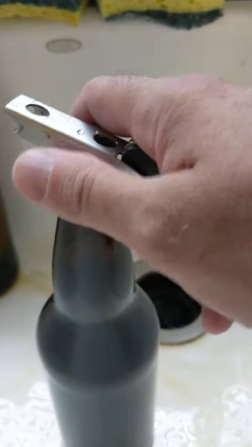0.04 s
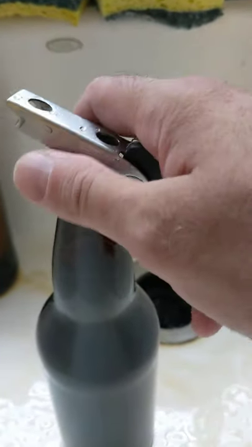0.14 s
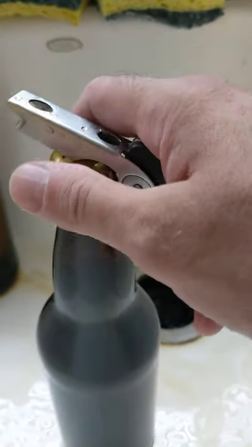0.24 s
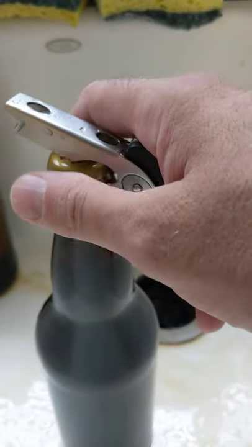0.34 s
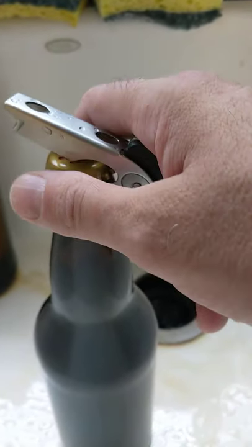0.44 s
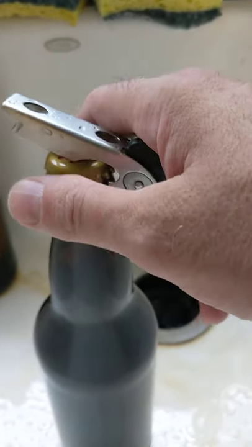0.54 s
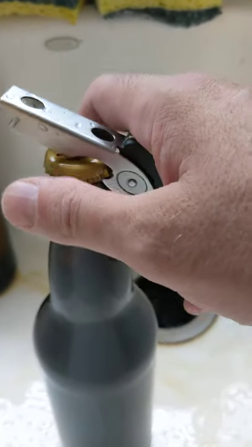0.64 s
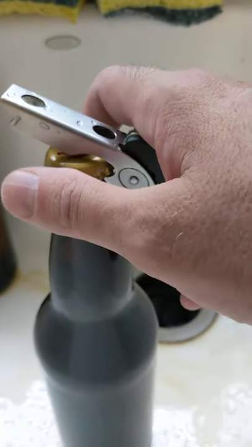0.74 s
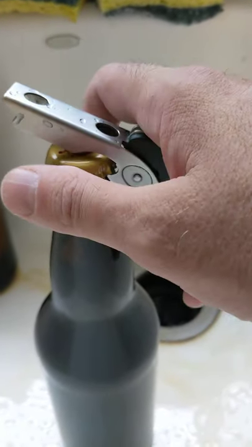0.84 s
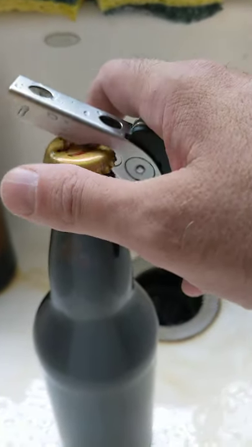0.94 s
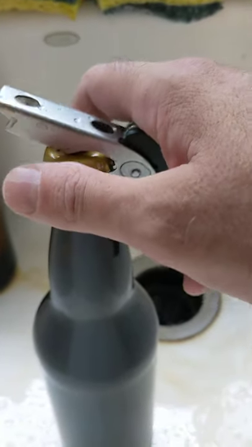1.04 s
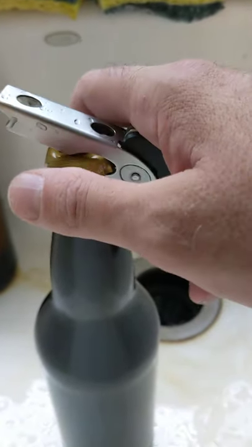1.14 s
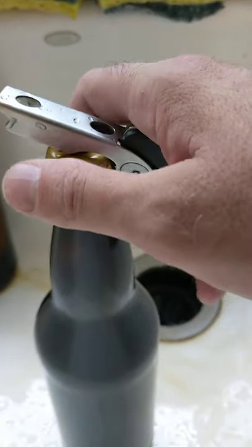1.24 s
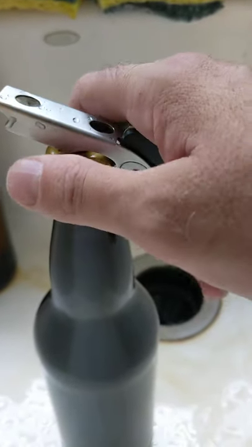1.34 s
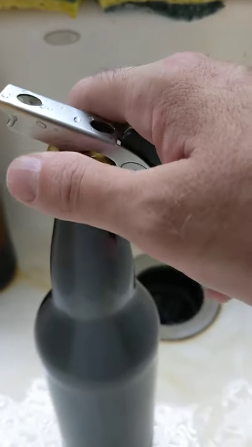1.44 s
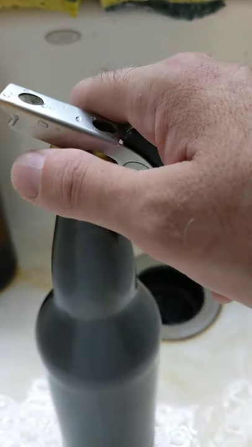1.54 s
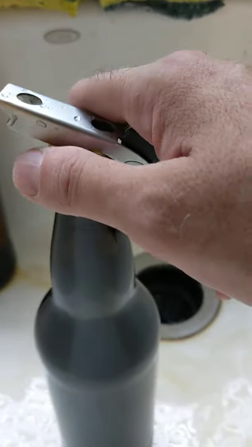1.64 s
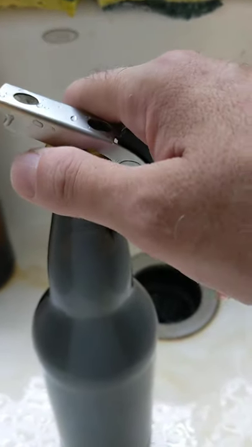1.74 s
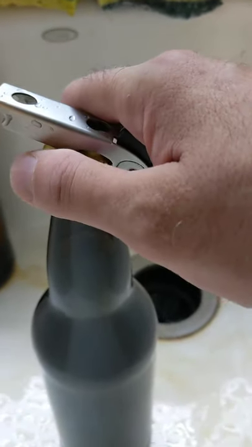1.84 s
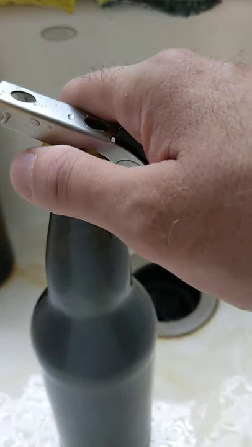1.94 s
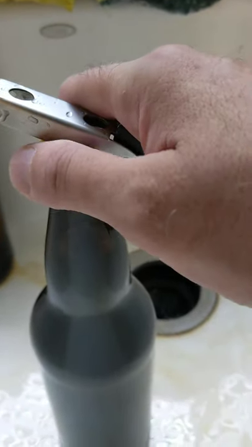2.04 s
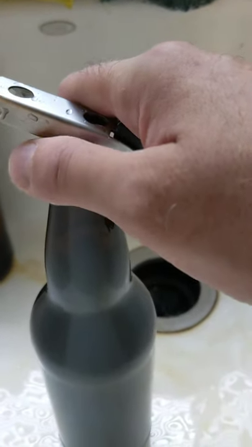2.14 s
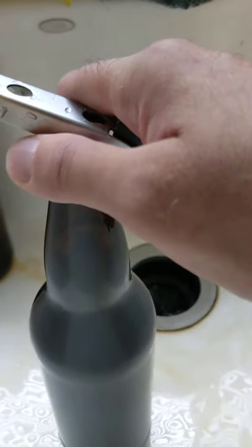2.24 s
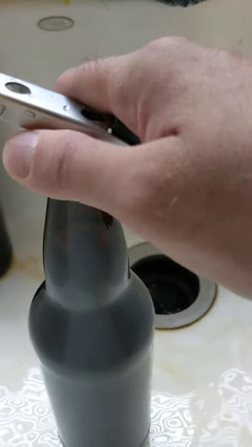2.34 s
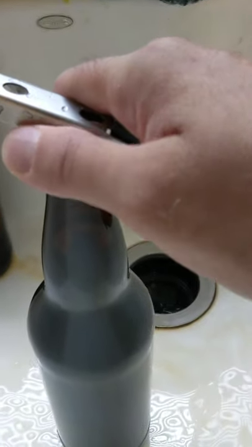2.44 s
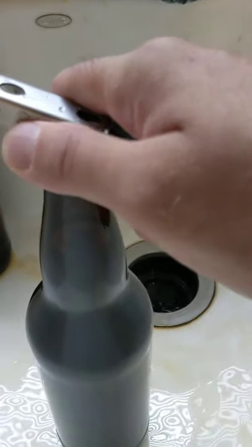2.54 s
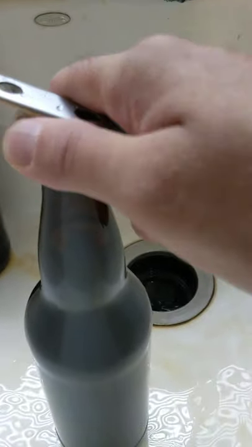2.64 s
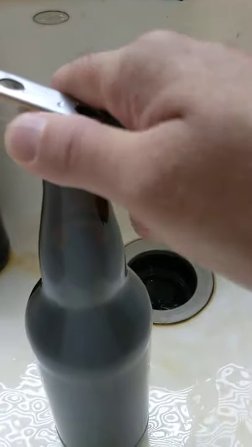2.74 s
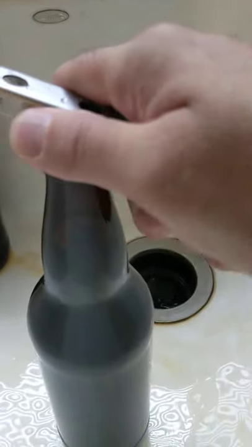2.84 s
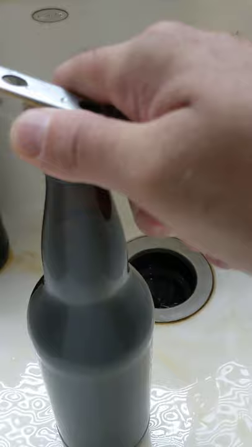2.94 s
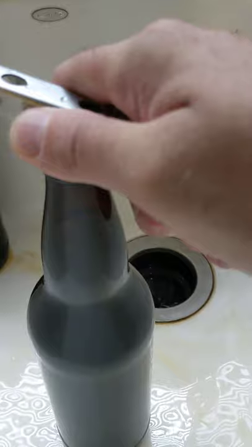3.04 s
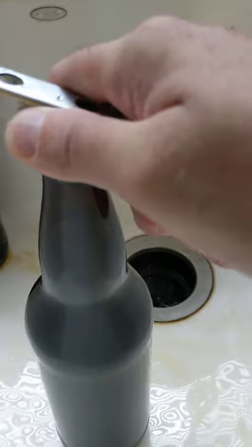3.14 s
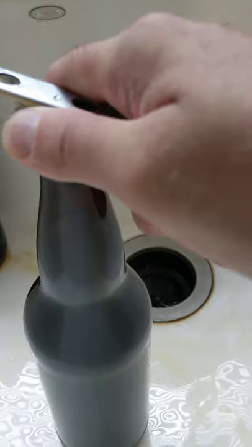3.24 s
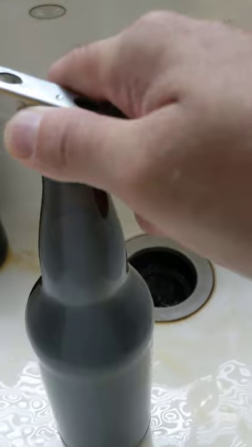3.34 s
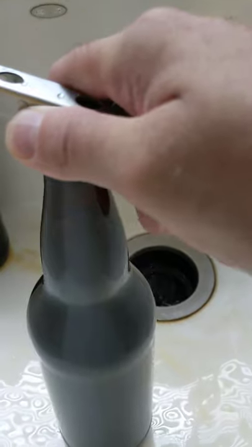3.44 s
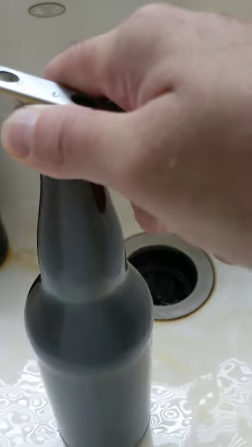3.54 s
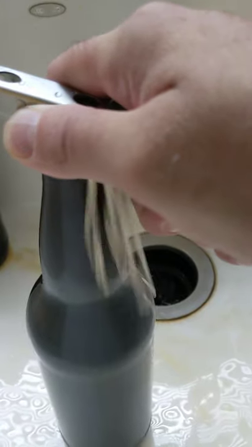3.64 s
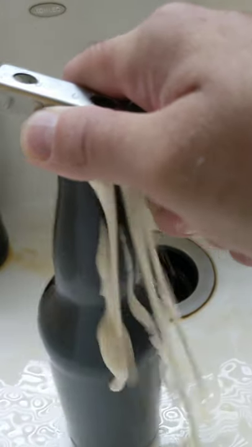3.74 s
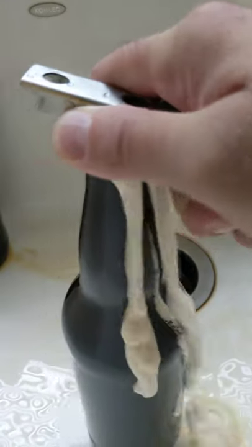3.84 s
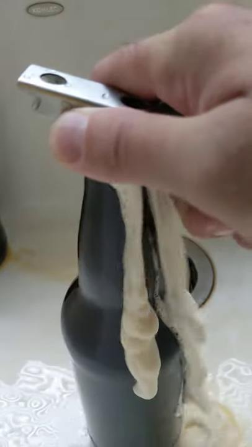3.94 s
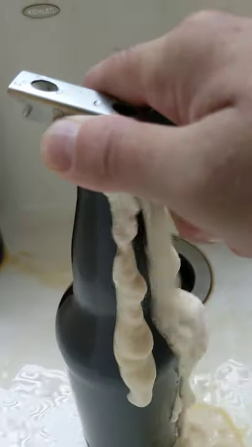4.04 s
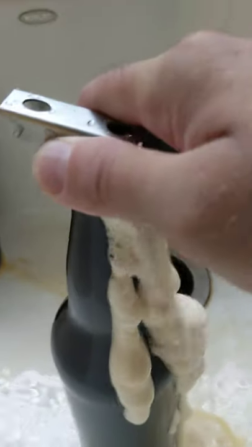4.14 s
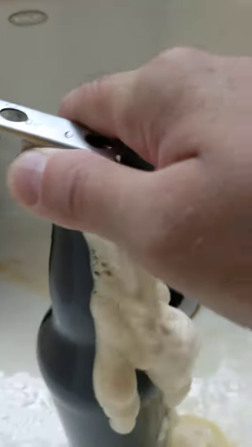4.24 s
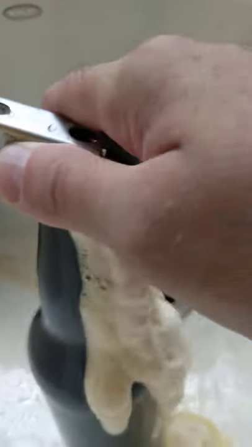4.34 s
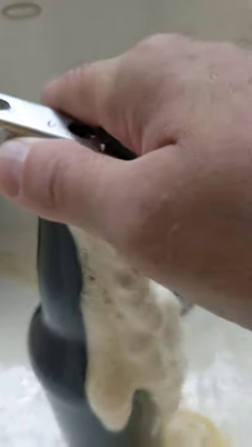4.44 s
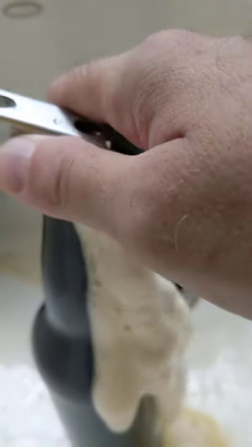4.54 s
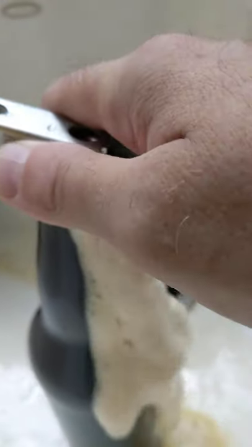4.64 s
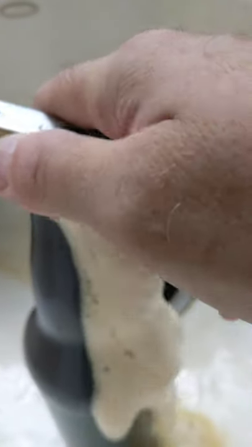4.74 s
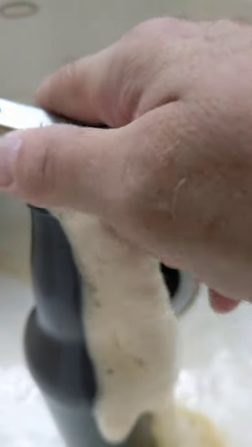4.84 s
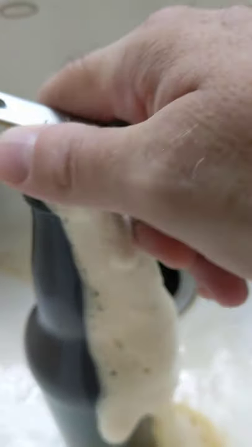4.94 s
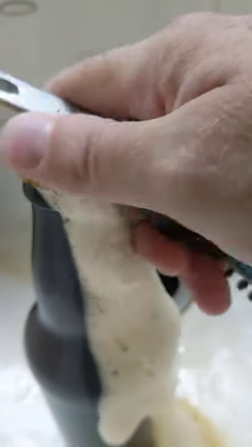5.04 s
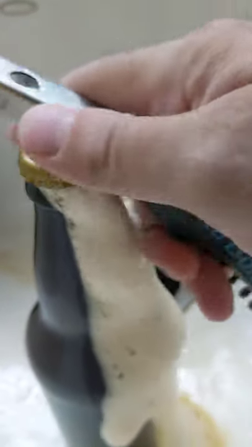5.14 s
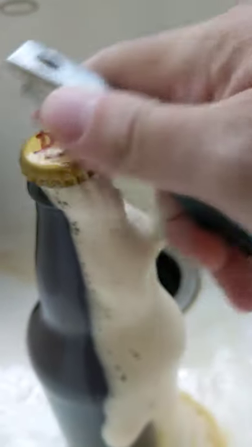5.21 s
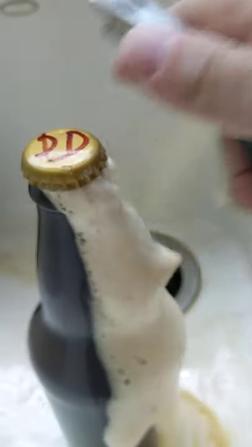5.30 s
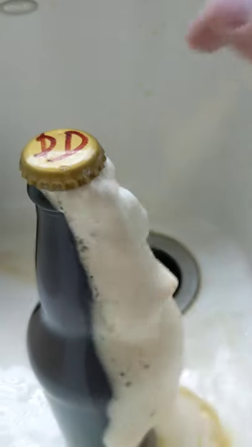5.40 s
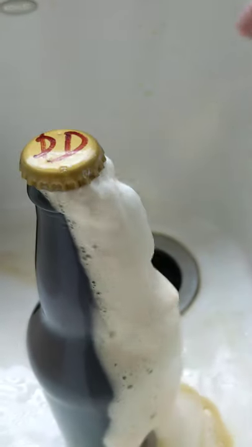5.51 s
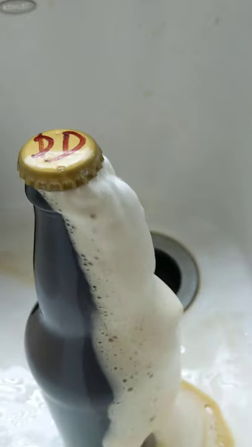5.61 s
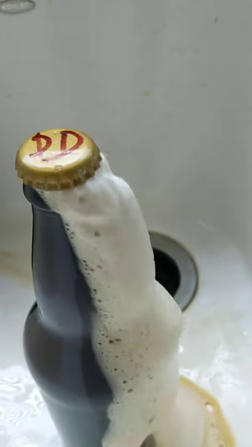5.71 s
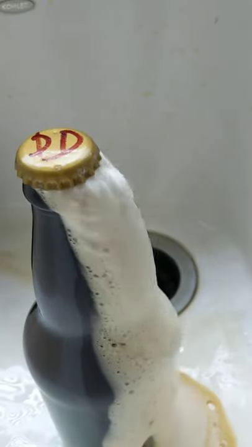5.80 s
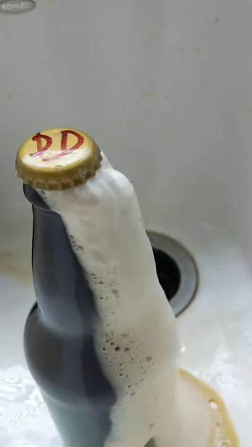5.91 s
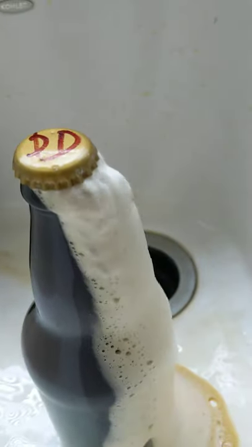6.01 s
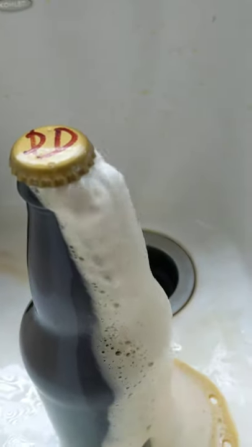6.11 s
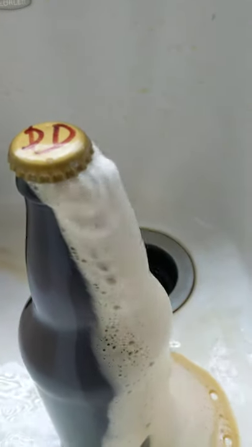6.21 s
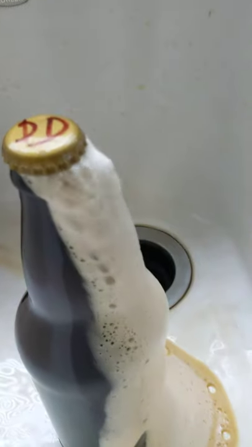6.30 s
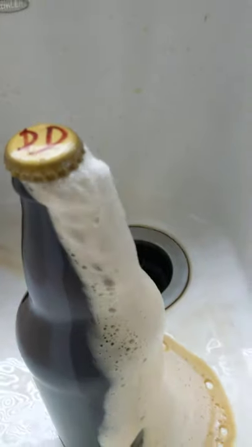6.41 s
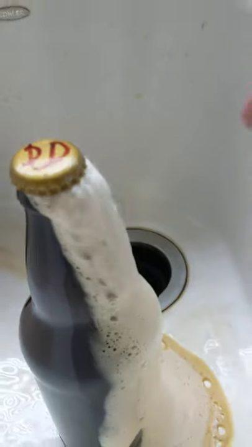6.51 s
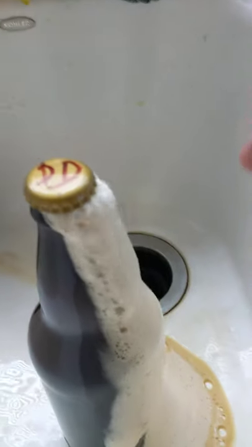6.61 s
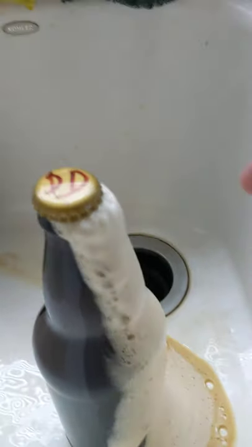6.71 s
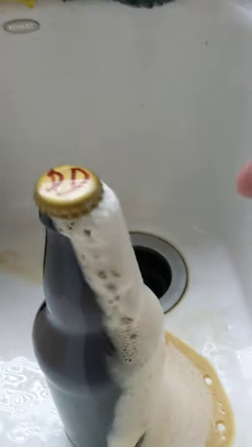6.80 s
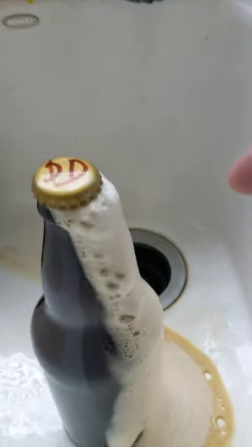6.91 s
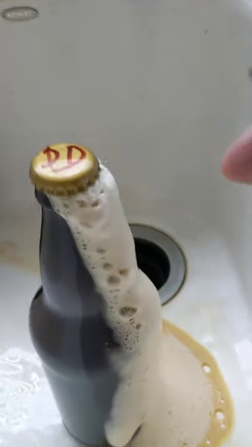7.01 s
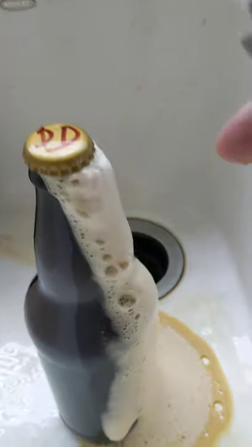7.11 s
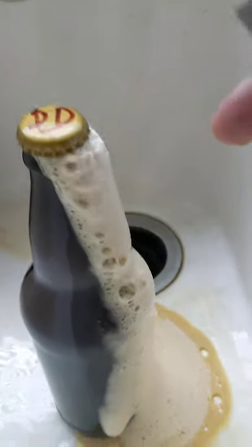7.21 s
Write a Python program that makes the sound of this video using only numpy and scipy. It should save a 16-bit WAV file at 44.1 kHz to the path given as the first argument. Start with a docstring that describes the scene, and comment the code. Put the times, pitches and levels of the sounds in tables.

```python
"""An over-carbonated bottle of beer is opened in a kitchen sink: gas and foam burst from under its cap.
The opener's contacts excite damped modes of bottle and handle; crimps snap as filtered impulses.
Escaping gas is a rush of random bubble pops, coloured and panned; the leak chokes, then a puff drives beer out.
Foam sums four bubble sizes and grows coarser as the pressure falls; falling beer thuds on the basin's modes
and splashes as short noise bands. Appliance motors hum as wavering sines over the noise of room air."""
import sys
import numpy as np
from scipy import signal
from scipy.fft import rfft, irfft, next_fast_len
from scipy.io import wavfile

SR = 44100
rng = np.random.default_rng(int(sys.argv[2]) if len(sys.argv) > 2 else 0)


def log_audio(samples):
    """Write samples as a 16-bit WAV file to the path given in sys.argv[1]."""
    # one column per channel
    frames = np.atleast_2d(samples).T
    # limit to full scale, then quantise
    limited = np.clip(frames, -1, 1)
    pcm = np.round(limited * 32767).astype(np.int16)
    wavfile.write(sys.argv[1], SR, pcm)


N = 320166


def from_db(db):
    """Logarithmic level: decibels become an amplitude gain."""
    return np.exp(np.log(10) / 20 * np.asarray(db))


def rms_one(x):
    """Power normalisation: scale to unit rms."""
    return x / np.sqrt(np.mean(x ** 2) + 1e-20)


def in_time(rows):
    """Linear interpolation: each column of a curve table, one value per sample."""
    s, *columns = np.transpose(rows)
    return [np.interp(np.arange(N) / SR, s, column) for column in columns]


def at_hz(points, hz):
    """Logarithmic pitch: interpolate a table on a log-frequency axis."""
    table_hz, values = np.transpose(points)
    return np.interp(np.log(hz + 1e-3), np.log(table_hz), values)


def since(start_s):
    """Elapsed time: seconds gone by after start_s, 0 before."""
    return np.maximum(np.arange(N) / SR - start_s, 0)


def fade(start_s, end_s):
    """Linear onset: a ramp that is 0 at start_s and 1 at end_s."""
    return np.clip((np.arange(N) / SR - start_s) / (end_s - start_s), 0, 1)


def bump(centre_s, width_s):
    """Gaussian envelope: a smooth swell of height 1."""
    return np.exp(-((np.arange(N) / SR - centre_s) / width_s) ** 2)


def drift(rate):
    """Slow random modulation: normal knots of spread 1, rate per second, joined by lines."""
    knots = rng.standard_normal(4000)
    return np.interp(np.arange(N) / SR * rate, np.arange(len(knots)), knots)


def band(x, low_hz, high_hz):
    """Band limitation: a causal Butterworth band-pass."""
    edges_hz = [low_hz, min(high_hz, .45 * SR)]
    return signal.sosfilt(signal.butter(2, edges_hz, "band", fs=SR, output="sos"), x + 1e-18)


def ring(clicks, hz, t60):
    """Damped resonance: a unit click sets a decaying sine of initial height 1 ringing."""
    decay = from_db(-60 / (t60 * SR))
    angle = 2 * np.pi * hz / SR
    return signal.lfilter([0, np.sin(angle)], [1, -2 * decay * np.cos(angle), decay ** 2], clicks + 1e-18)


def colour(pair, spectrum, likeness, pan, resonances=()):
    """Interaural coherence: two unrelated signals get a spectrum and a stereo place; their mid has rms 1."""
    size = next_fast_len(N)
    hz = np.arange(size // 2 + 1) * SR / size
    a, b = rfft(pair, size)
    level_db = at_hz(spectrum, hz)
    for centre_hz, width_hz, db in resonances:
        level_db = level_db + db / (1 + (2 * (hz - centre_hz) / width_hz) ** 2)
    # roll off beyond both ends of the spectrum table
    top_edge = 1 / (1 + (hz / spectrum[-1][0] / 1.2) ** 8)
    low_edge = 1 / (1 + (.7 * spectrum[0][0] / (hz + 1)) ** 4)
    sides = np.array([[1], [-1]])
    alike = np.clip(at_hz(likeness, hz), -1, 1)
    both = np.sqrt(1 + alike) * a + np.sqrt(1 - alike) * b * sides
    gain = top_edge * low_edge * from_db(level_db + sides * at_hz(pan, hz) / 2)
    out = irfft(both * gain, size)[:, :N]
    return out / np.std(out.mean(axis=0))


def reflect(x, t60):
    """Diffuse reverberation: dense decaying reflections, different at each ear, from a unit-energy response."""
    t = np.arange(SR // 2) / SR
    echoes = rng.standard_normal((2, len(t))) * from_db(-60 * t / t60) * (1 - np.exp(-t / .002))
    echoes /= np.sqrt(np.sum(echoes ** 2, axis=1, keepdims=True))
    return signal.oaconvolve(np.atleast_2d(x), echoes[:, t < t60], axes=1)[:, :N]


SINK_T60_S = 0.083


def bursts(per_s, spread_db):
    """Shot noise: random pops of uneven size on two sides of the cap, heard directly and off the sink walls."""
    chance = rng.laplace(0, 1, (2, N))
    sizes = np.sign(chance) * from_db(spread_db * np.minimum(np.abs(chance), 6))
    pops = sizes * (rng.random((2, N)) < per_s / SR)
    # the outflow wanders round the rim, so the echoes shift in colour
    turn = np.pi / 4 + .5 * drift(2.093)
    echo_a = np.cos(turn) * reflect(pops[0], SINK_T60_S)
    echo_b = np.sin(turn) * reflect(pops[1], SINK_T60_S)
    return pops + echo_a + echo_b


def swishes(rows, pan_db, grain_db):
    """Band noise: short, uneven swells, partly alike at both ears."""
    out = np.zeros((2, N))
    for s, length, db, hz, octaves in rows:
        progress = fade(s, s + length)
        during = (progress % 1) > 0
        swell = np.sqrt(np.sin(np.pi * progress[during])) * from_db(grain_db * drift(250)[during])
        noise = rng.standard_normal((3, SR))
        half_width = 2 ** (octaves / 2)
        noise = rms_one(band(noise[2] + 0.61 * noise[:2], hz / half_width, hz * half_width))
        out[:, during] += from_db(db) * swell * noise[:, -len(swell):]
    return out * from_db([[pan_db / 2], [-pan_db / 2]])


# appliance motors and mains: (frequency [Hz], rms level [dB])
HUM = [(18.4, -47), (39.0, -51), (58.1, -37.5), (61.6, -60), (120, -57), (238, -91), (301, -61.5)]
# spectrum of room air: (frequency [Hz], relative density [dB per Hz])
AIR = [(25, 12.5), (100, -3.5), (165, 4), (195, -10.5), (310, -0.5), (450, -8.5), (800, -16.5),
       (1300, -25.5), (2000, -30.5), (3200, -27), (6000, -31.5), (9500, -36.5), (12700, -41.5),
       (15800, -43)]
# stereo balance of room air: (frequency [Hz], left minus right [dB])
AIR_PAN = [(60, 2.8), (500, 3.7), (3000, 4.3), (12000, 3.9)]
# coherence of room air between the ears: (frequency [Hz], left-right likeness [-1 to 1])
AIR_LIKENESS = [(100, 0.94), (300, 0.59), (800, 0.3), (2500, 0.046)]
AIR_DB = -49.5


def kitchen():
    """Periodic machine tones: motors hum with a slight waver over the soft rush of room air."""
    t = np.arange(N) / SR - np.array([[0], [.0007]])   # the hum reaches the right ear a little later
    hum = np.zeros((2, N))
    for hz, db in HUM:
        height = np.sqrt(2) * from_db(db + 0.8 * drift(3.12))
        hum += height * np.sin(2 * np.pi * (hz * t + rng.random()) + 0.04 * drift(1.9))
    air = colour(rng.standard_normal((2, N)), AIR, AIR_LIKENESS, AIR_PAN)
    return hum * from_db([[.8], [-.8]]) + from_db(AIR_DB) * air


def crunch(at, level_db, low_hz, high_hz, t60):
    """Stick-slip friction: band noise of tiny slips builds up and dies away as the crimped metal gives."""
    clicks = np.zeros(N)
    clicks[at] = from_db(level_db)
    t = np.arange(SR // 4) / SR
    envelope = from_db(-60 * t / t60) * (1 - np.exp(-t / 0.0015))
    force = signal.oaconvolve(clicks, envelope)[:N]
    return force * from_db(4.3 * drift(400)) * rms_one(band(rng.standard_normal((2, N)), low_hz, high_hz))


# opener on cap: (time [s], knock level [dB], bright bottle ring re knock [dB], steel handle re knock [dB])
CONTACTS = [(0.025, -45, -8.5, -17), (0.168, -43.5, -31, -19), (0.312, -51, -25, -26), (0.666, -32, 2, -26),
            (1.060, -38.5, 1, -3.5), (1.075, -40, -9, -9), (1.092, -37, 6, -19), (1.1, -48, 10, -12),
            (1.18, -43.5, -31, -31), (1.193, -45.5, -21, -26), (1.24, -49, -6, -11), (1.484, -46, -20, -28)]
# modes of the capped bottle: (frequency [Hz], relative level [dB], decay t60 [s])
BOTTLE = [(236, -7, 0.36), (451, -6.5, 0.062), (533, 7, 0.05), (641, -8, 0.11), (1146, -3.5, 0.075),
          (2610, -11, 0.098), (2630, -27, 0.5), (2880, -15, 0.13), (3280, -8.5, 0.068), (5140, -10, 0.085),
          (5300, -16, 0.11), (5800, -18, 0.083), (5780, -24, 0.2), (6340, -20, 0.12), (7170, -11, 0.14),
          (7350, -14, 0.11), (7530, -14, 0.18), (9640, -1, 0.19), (11100, -11, 0.14)]
# modes of the steel handle, in close pairs that beat: (frequency [Hz], relative level [dB], decay t60 [s])
HANDLE = [(1448, -14, 0.84), (1502, -9, 0.85), (2584, 1, 0.19), (2720, -13, 0.28), (3994, -9, 0.4),
          (4120, -8, 0.27), (4180, 0.5, 0.22), (4300, -9, .26), (4689, -15, 0.2)]
# steel sliding on the cap: (time [s], length [s], level [dB], centre [Hz], width [octaves])
RUBS = [(0.0, 0.25, -70.5, 10500, .5), (0.0, 0.34, -70, 4200, 1.1), (.93, .08, -66, 5200, 0.13),
        (.95, 0.24, -62, 3270, .6), (.94, 0.071, -63, 750, 1.1), (1.2, .34, -73, 9800, 0.27),
        (2.02, 0.092, -70, 3130, 1.1)]
TICK_DB = -13.5   # the highest modes, relative to the bright ring
THUMP_DB, THUMP_SOFTNESS = -11.5, 0.61   # dB re knock; the duller a touch, the more it thumps, dB per dB
KITCHEN_T60_S = 0.38


def opener():
    """Modal excitation: each bite crunches the cap and rings bottle and handle; the kitchen answers."""
    s, knock_db, bright_db, steel_db = np.transpose(CONTACTS)
    at = np.round(s * SR).astype(int)
    ring_db, handle_db = knock_db + bright_db, knock_db + steel_db
    tick_db = ring_db + TICK_DB
    thump_db = knock_db + THUMP_DB - THUMP_SOFTNESS * bright_db
    out = crunch(at, knock_db - 7.0, low_hz=320, high_hz=750, t60=0.075)
    out += crunch(at, thump_db, low_hz=222, high_hz=282, t60=0.11)
    out += crunch(at, ring_db - 6, low_hz=2500, high_hz=3500, t60=.035)
    out += crunch(at, ring_db - 1, low_hz=4800, high_hz=8000, t60=.048)
    out += crunch(at, tick_db + 0.5, low_hz=8900, high_hz=12500, t60=0.065)
    # low modes follow the knock, middle ones the bright ring, the highest the tick
    drive_db = [knock_db if hz < 2000 else ring_db if hz < 9000 else tick_db for hz, db, t60 in BOTTLE]
    drive_db += [handle_db] * len(HANDLE)
    for (hz, db, t60), mode_drive_db in zip(BOTTLE + HANDLE, drive_db):
        clicks = np.zeros(N)
        clicks[at] = from_db(mode_drive_db + db - 4 + rng.normal(0, 1, len(at)))
        out += ring(clicks, hz, t60)
    out = out + from_db(-4.5) * reflect(out, KITCHEN_T60_S)
    return out * from_db([[1.5], [-3]]) + swishes(RUBS, pan_db=9, grain_db=2.5)


# crimps of the cap snapping as they bend: (time [s], level before a 6 dB lift [dB], low [Hz], high [Hz])
SNAPS = [(0.4037, -27, 9200, 15500), (0.407, -24.5, 10400, 15900), (0.54, -37, 8000, 12000),
         (0.547, -29, 4500, 10500), (0.5478, -29, 3500, 10900)]


def crimps():
    """Impulse response: each tiny dry snap is a band-passed impulse, echoed by the sink."""
    out = np.zeros(N)
    for s, db, low_hz, high_hz in SNAPS:
        at = round(s * SR)
        out[at:at + 256] += from_db(db + 6) * band(signal.unit_impulse(256), low_hz, high_hz)
    return (out + from_db(-3.5) * reflect(out, SINK_T60_S)) * from_db([[2], [-2]])


# spectra of the gas hiss, its finest part and wet spitting: (frequency [Hz], relative density [dB per Hz])
GAS = [(4000, -29), (6000, -15), (6800, -14), (7600, -5.5), (8400, -4.5), (9400, 0.5), (9900, 1.5),
       (10700, -6), (11500, 0), (12700, -17), (14000, -7.5), (15800, -8.5)]
MIST = [(10500, -7.5), (12400, -5.5), (13800, -7), (14700, -7.5), (16000, -11)]
SPIT = [(300, -7), (900, -14.5), (1250, -12.5), (1700, -11.5), (2200, -9.5), (2700, -3.5), (3300, -3.5),
        (4400, 1), (5600, 5.5), (6500, -3.5), (8000, 0)]
# resonances of the hollow between cap, hand and sink: (frequency [Hz], width [Hz], boost [dB])
HOLLOW = [(695, 110, 11.5), (1362, 150, 4), (2940, 200, 4), (3208, 18, 5.5), (3783, 110, 5.5),
          (4180, 490, 6.5), (5060, 37, 7.5), (5600, 190, 6), (7190, 130, 5), (7570, 100, 5), (9300, 120, 3),
          (9900, 170, 3)]
# stereo balance of gas and foam: (frequency [Hz], left minus right [dB])
FIZZ_PAN = [(60, 0), (99, 4), (160, 24), (270, 3), (450, 8), (740, 13), (1220, 11.5), (2010, 3),
            (3330, 8.5), (5500, 5), (9080, 7.5), (15000, -0.5)]
# coherence of gas and foam between the ears: (frequency [Hz], left-right likeness [-1 to 1])
FIZZ_LIKENESS = [(150, 1), (300, 0.34), (500, 0.41), (620, -.1), (800, 0.33), (1050, -0.16), (1300, 0.64),
                 (1550, 0.27), (2100, -0.37), (3000, -0.0084)]
# the seal gives: the hiss swells, overshoots, holds, then dies as liquid chokes the gap
LEAK_S, LEAK_ATTACK_S, LEAK_DB = 2.6764, 0.095, -27
OVERSHOOT_DB, OVERSHOOT_S = 2.5, 0.15
CHOKE_S, CHOKE_DB_PER_S = 3.303, 39.5
SPIT_DB, SPIT_FOLLOWS = -40, 0.86   # wet spitting, and its share of the hiss's swing
TOP_DB, TOP_FOLLOWS = -35, 2.1   # the finest hiss needs the most pressure and dies first
# a puff of gas drives out the first slug of beer
PUFF_S, PUFF_DB, PUFF_T60_S = 3.651, -34, 0.086
# beer wells up in the gap and spits ahead of the foam
WELL_S, WELL_WIDTH_S, WELL_DB = 3.74, 0.084, -38.5


def gas():
    """Turbulent jet noise: gas hisses and spits through the wet seal until liquid chokes it; a puff follows."""
    overshoot_db = OVERSHOOT_DB * np.exp(-(since(LEAK_S + LEAK_ATTACK_S) / OVERSHOOT_S) ** 2)
    flow_db = overshoot_db - CHOKE_DB_PER_S * since(CHOKE_S)
    puff = from_db(PUFF_DB - 60 * since(PUFF_S) / PUFF_T60_S) * (since(PUFF_S) > 0)
    well = from_db(WELL_DB) * bump(WELL_S, WELL_WIDTH_S)
    hiss = colour(bursts(per_s=30000, spread_db=2.5), GAS, FIZZ_LIKENESS, FIZZ_PAN, HOLLOW)
    top = colour(bursts(per_s=30000, spread_db=0.0), MIST, FIZZ_LIKENESS, FIZZ_PAN)
    spit = colour(bursts(per_s=12000, spread_db=3.0), SPIT, FIZZ_LIKENESS, FIZZ_PAN)
    leak = hiss * (from_db(LEAK_DB + flow_db) + puff)
    leak += top * from_db(TOP_DB + TOP_FOLLOWS * flow_db)
    leak += spit * (from_db(SPIT_DB + SPIT_FOLLOWS * flow_db) + well)
    return leak * from_db(.5 * drift(60)) * fade(LEAK_S, LEAK_S + LEAK_ATTACK_S) ** 2


# foam jet at the cap: (time [s], spray level before the gush [dB], coarseness: big bubbles over spray [dB])
FOAM = [(4.0, -27.5, -3.5), (4.04, -27, -4), (4.65, -29, -3), (5.42, -25.5, -8), (5.76, -23.5, -7.5),
        (6.22, -28, -0.5), (6.4, -27, -0.5), (6.59, -34.5, 4.5), (7.26, -32.5, 5)]
# spectra of three larger bubble sizes, small to large: (frequency [Hz], relative density [dB per Hz])
SPRAY = [(3500, -23.5), (6000, -2), (6600, -4), (7400, -1.5), (8300, -3), (9600, 1.5), (10600, -6),
         (11500, -0.5), (12400, -19), (14000, -34)]
COARSE = [(1500, -22.5), (2200, -6.5), (2800, 1), (4100, -1), (4800, 2), (5700, 0.5), (6300, -11),
          (8000, -51)]
FROTH = [(130, -12.5), (300, -3), (480, -6.5), (700, -7), (950, -5), (1200, 1), (1450, 1.5), (1650, -2.5),
         (2000, 1.5), (3000, -7)]
# breathy whistles of foam in the gap: (time [s], length [s], level [dB], centre [Hz], width [octaves])
WHISTLES = [(6.38, 0.58, -51, 5770, .08), (7.06, 0.47, -37.5, 4110, 0.018), (7.13, 0.22, -41, 3230, 0.046)]
GUSH_S, GUSH_WIDTH_S, GUSH_DB = 3.86, 0.082, 4.5   # the first gush overshoots
COARSE_DB, COARSE_FOLLOWS = -0.78, 1.096   # big bubbles re spray; dB per dB of coarseness
MIST_DB, MIST_BELOW_DB, MIST_GROWTH = -7.5, -5, 1.9   # mist grows once coarseness is below this, dB per dB
FROTH_DB, FROTH_DB_PER_S = -43, 0.9   # froth piles up on the bottle
# the spray starts once the gap is clear, froth gathers more slowly: (start s, full s)
SPRAY_IN, FROTH_IN = (3.715, 3.795), (3.54, 3.98)
SURGE_DB, SURGES_PER_S = 0.58, 7.3   # each size of bubble comes in small surges


def foam():
    """Bubble acoustics: of four bursting sizes, the smaller are higher and more numerous; coarseness mixes them."""
    jet_db, coarseness_db = in_time(FOAM)
    jet_db = jet_db + GUSH_DB * bump(GUSH_S, GUSH_WIDTH_S)
    mist_db = jet_db + MIST_DB + MIST_GROWTH * np.maximum(MIST_BELOW_DB - coarseness_db, 0)
    coarse_db = jet_db + COARSE_DB + COARSE_FOLLOWS * coarseness_db
    froth_db = FROTH_DB + FROTH_DB_PER_S * since(GUSH_S)
    sizes = [(MIST, mist_db, SPRAY_IN, bursts(per_s=30000, spread_db=2.5)),
             (SPRAY, jet_db, SPRAY_IN, bursts(per_s=12000, spread_db=2.0)),
             (COARSE, coarse_db, SPRAY_IN, bursts(per_s=4000, spread_db=2.7)),
             (FROTH, froth_db, FROTH_IN, bursts(per_s=3000, spread_db=1.5))]
    fizz = np.zeros((2, N))
    for spectrum, db, onset, pops in sizes:
        level = from_db(db + SURGE_DB * drift(SURGES_PER_S)) * fade(*onset) ** 1.74
        fizz += level * colour(pops, spectrum, FIZZ_LIKENESS, FIZZ_PAN, HOLLOW)
    sputter_db = 0.63 * drift(70)   # the flow through the gap is uneven
    return fizz * from_db(sputter_db) + swishes(WHISTLES, pan_db=19, grain_db=4.5)


# the first slug of beer lands: (time [s], level [dB])
THUDS = [(3.653, -30), (3.6607, -24.5), (3.674, -28)]
# modes of the sink basin: (frequency [Hz], relative level [dB], decay t60 [s])
BASIN = [(103, -5, 0.11), (175, -7, .05), (267, 1, 0.057)]
# beer splashing on the sink floor: (time [s], length [s], level [dB], centre [Hz], width [octaves])
SPLASHES = [(3.651, 0.024, -48, 760, 1.6), (3.802, 0.044, -39.5, 614, 1.3), (3.847, 0.011, -32.5, 720, 0.9),
            (3.853, .012, -39.5, 256, 0.44), (3.855, 0.047, -36.5, 710, 1.4)]


def spill():
    """Impact response: falling beer excites the basin's damped modes as a dull thud, then splashes."""
    clicks = np.zeros(N)
    for s, db in THUDS:
        clicks[round(s * SR)] = from_db(db)
    thud = sum(from_db(db) * ring(clicks, hz, t60) for hz, db, t60 in BASIN)
    thud = band(thud, low_hz=70, high_hz=447) * from_db([[2], [-2]])
    return thud + swishes(SPLASHES, pan_db=4.0, grain_db=1.0)


def scene():
    """Superposition: the sounds of kitchen and sink add."""
    return kitchen() + opener() + crimps() + gas() + foam() + spill()


CUTOFF_HZ = 15750


def record(dry):
    """Low-pass filtering: a steep elliptic filter cuts the top."""
    return signal.sosfilt(signal.ellip(12, .1, 80, CUTOFF_HZ, fs=SR, output="sos"), dry)


dry = scene()
out = record(dry)
log_audio(out)
```